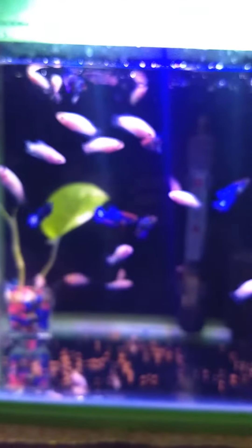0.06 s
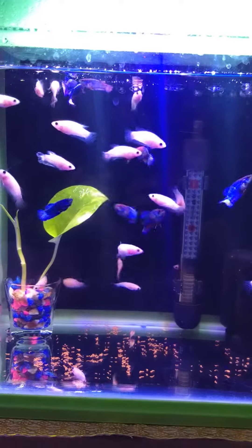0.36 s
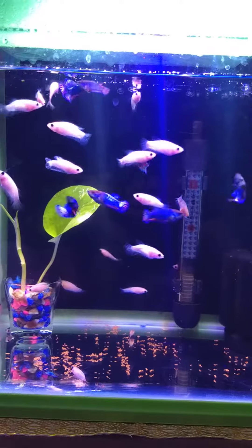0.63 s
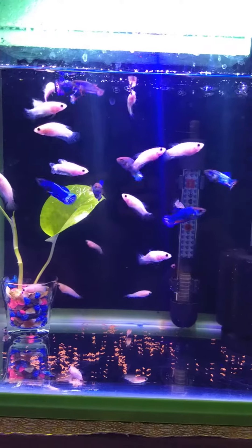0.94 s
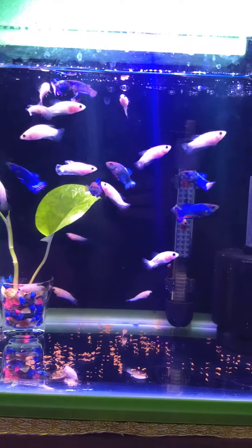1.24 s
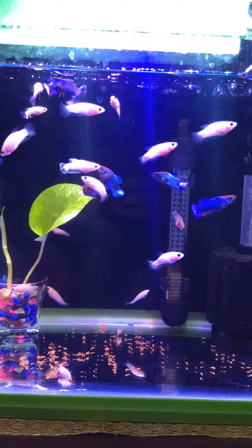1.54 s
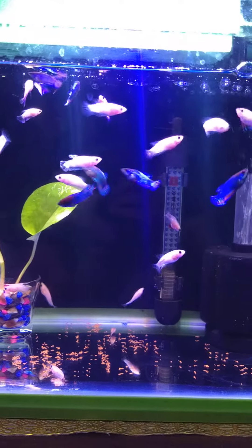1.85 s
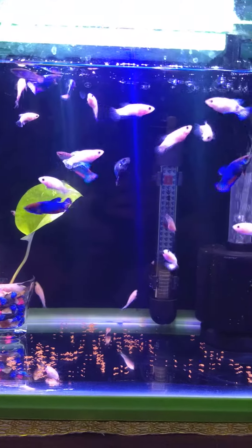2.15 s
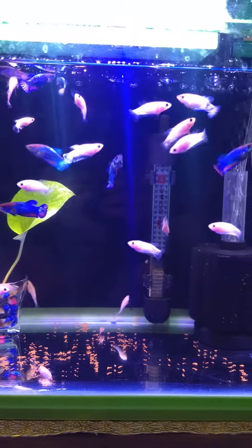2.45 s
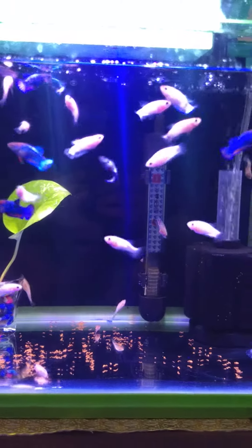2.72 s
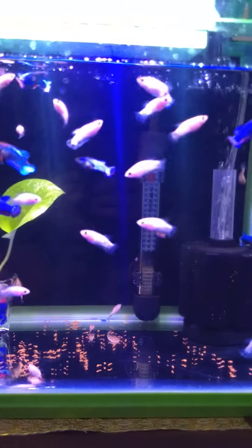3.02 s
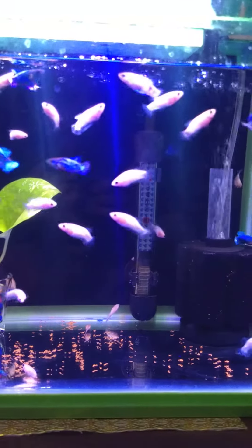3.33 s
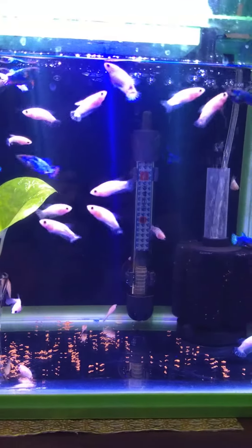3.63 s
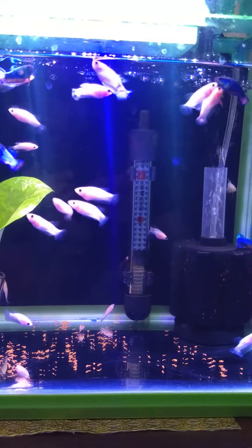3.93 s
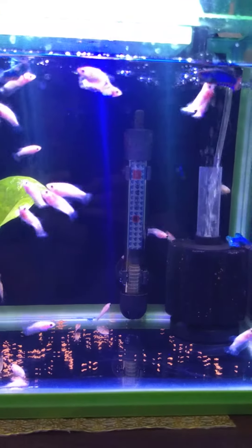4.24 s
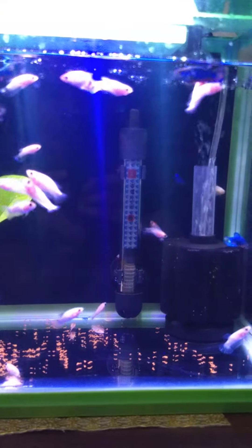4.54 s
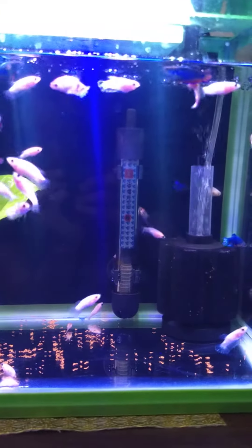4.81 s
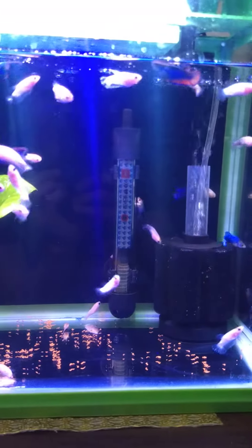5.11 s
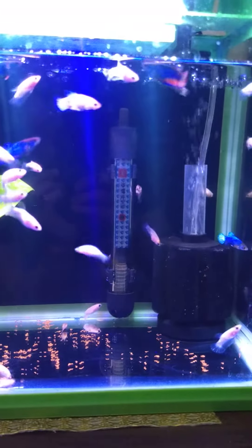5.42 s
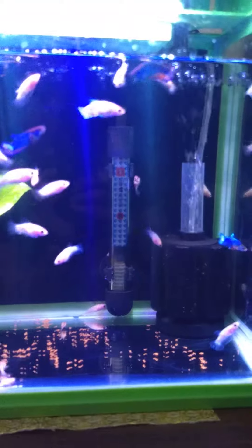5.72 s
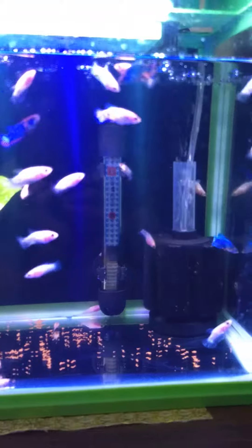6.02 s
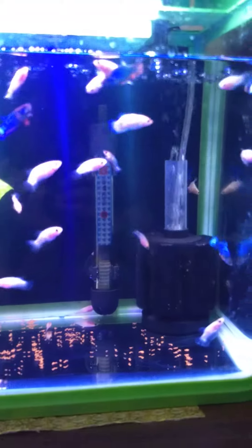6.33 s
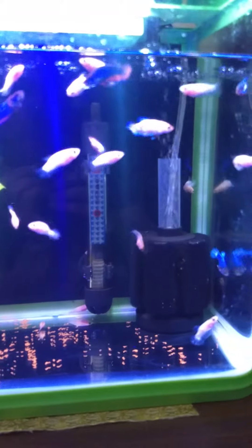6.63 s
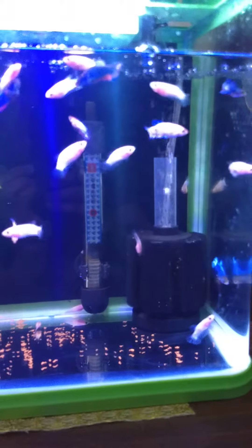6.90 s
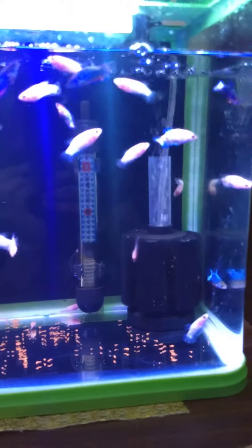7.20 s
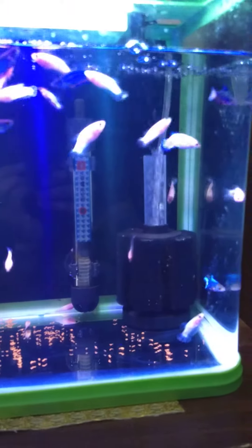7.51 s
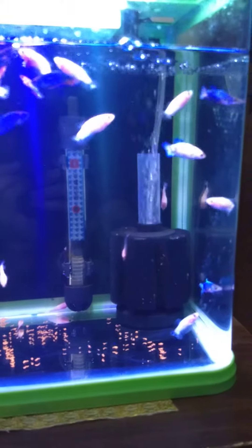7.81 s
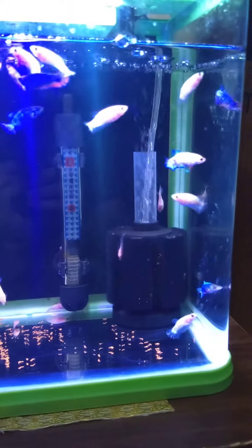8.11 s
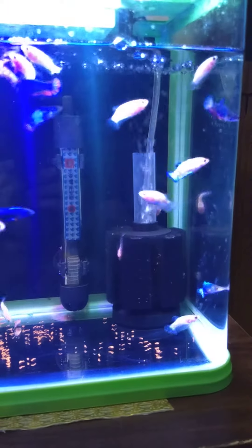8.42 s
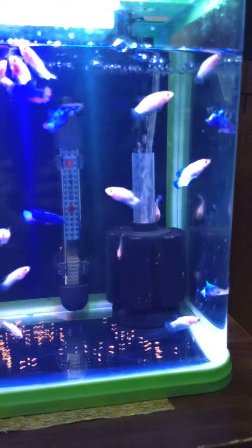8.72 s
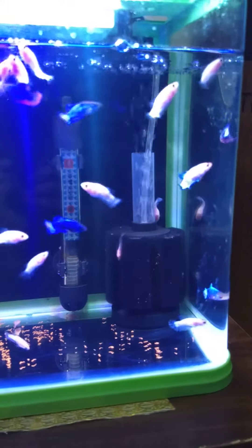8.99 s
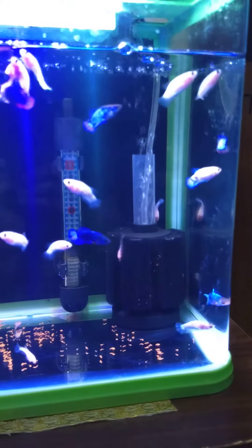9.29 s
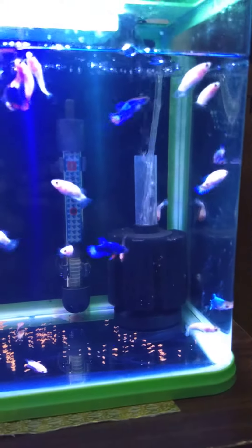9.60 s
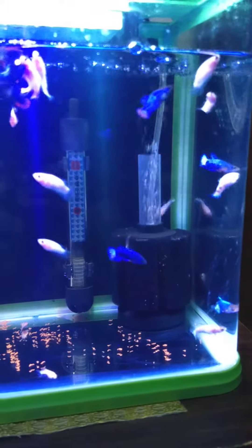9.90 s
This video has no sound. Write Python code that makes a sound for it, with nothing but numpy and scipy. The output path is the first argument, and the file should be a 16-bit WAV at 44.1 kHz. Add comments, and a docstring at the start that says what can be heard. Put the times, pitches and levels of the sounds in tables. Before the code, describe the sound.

A home aquarium's air pump hums steadily in a quiet room while its filter sends up a fine stream of small bubbles. Two sharp, dry clicks sound close by early on. Just past the middle, something scrapes twice, bumps softly and slides on faintly among a few light ticks. The hum and gentle bubbling carry on to the end, heard from near the tank.

```python
"""A low hum and a fine stream of bubbles: a home aquarium in a quiet room. The air pump's diaphragm
taps at mains rate and drones through the tank, while a sponge filter sends up small ringing bubbles.
A few dry clicks sound nearby; something scrapes twice, bumps and slides on faintly. The phone's noise
suppressor opens a little after sharp sounds, and its stereo widener spreads the treble."""
import sys
import numpy as np
from scipy import signal
from scipy.fft import rfft, irfft
from scipy.io import wavfile
from scipy.ndimage import uniform_filter1d

SR = 44100
rng = np.random.default_rng(int(sys.argv[2]) if len(sys.argv) > 2 else 0)


def store_wav(level_fs):
    """Save 16-bit WAV to argv[1]."""
    pcm = np.round(np.clip(np.atleast_2d(level_fs), -1, 1) * 32767)
    wavfile.write(sys.argv[1], SR, pcm.T.astype(np.int16))


N = 438794
TIME = np.arange(N) / SR
FREQ = np.maximum(np.arange(N // 2 + 1) * SR / N, 1)


def undb(db):
    """Decibels to gain."""
    return 10 ** (np.asarray(db) / 20)


def unit(x):
    """Scale to rms 1."""
    return x / np.sqrt(np.mean(x ** 2))


def shape(x, gain):
    """Filter with a gain given at every frequency."""
    return irfft(rfft(x) * gain, N)


def resonance(f, hz, width):
    """Response of one mode, gain 1 at its centre."""
    return 1 / (1 + 1j * (f * f - hz * hz) / (f * width))


def walk(rate_hz):
    """Smooth random drift with a spread near 1."""
    hold = int(SR / rate_hz)
    steps = np.repeat(rng.standard_normal(N // hold + 1), hold)
    return 1.3 * uniform_filter1d(uniform_filter1d(steps, hold), hold)[:N]


def add(out, start_s, sound):
    """Mix a sound in at its start time."""
    i = max(int(start_s * SR), 0)
    out[..., i:i + sound.shape[-1]] += sound[..., :max(N - i, 0)]


def in_room(x, send_db, t60=0.55):
    """The dry sound plus a small room's diffuse tail, different at each microphone."""
    t = TIME[:SR // 2]
    tail = rng.standard_normal((2, len(t))) * np.exp(-np.log(1000) * t / t60) * (t > .004)
    tail /= np.sqrt(np.sum(tail ** 2) / 2)
    return x + undb(send_db) * signal.fftconvolve(x, tail, axes=1)[:, :N]


def air(alike_below_hz=1300, likeness=0.81, flicker_db=.5):
    """Steady wash of room and moving water; the lows are alike at both microphones."""
    # tone of the wash: (frequency [Hz], density [dB per Hz])
    wash_spectrum = [(33, -110), (39, -96), (49, -80.5), (75, -85.5), (125, -83.5), (300, -77.5),
                     (450, -85), (620, -86), (800, -77), (1000, -91.5), (1400, -85.5), (1800, -87.5),
                     (2500, -87), (4200, -94), (6400, -94.5), (8000, -100.7), (13000, -105.5)]
    hz, db = np.transpose(wash_spectrum)
    colour = undb(np.interp(np.log(FREQ), np.log(hz), db)) * np.sqrt(SR / 2)
    alike = likeness / (1 + (FREQ / alike_below_hz) ** 4)
    mid = shape(rng.standard_normal(N), colour * np.sqrt((1 + alike) / 2))
    side = shape(rng.standard_normal(N), colour * np.sqrt((1 - alike) / 2))
    return np.array([mid + side, mid - side]) * undb(flicker_db * walk(7.6))


def burst(hz, width_hz, t60):
    """One contact: quickly dying noise through one resonance."""
    t = TIME[:SR // 2]
    f = np.maximum(np.arange(len(t) // 2 + 1) * SR / len(t), 1)
    decay = np.exp(-np.log(1000) * t / t60)
    noise = rng.standard_normal((2, len(t))) * decay
    sound = irfft(rfft(noise) * resonance(f, hz, width_hz) ** 2, len(t))
    return sound * np.sqrt(2 * np.sum(decay ** 2) / np.sum(sound ** 2))


def ticks():
    """Soft, unpitched ticks that carry into the room."""
    # light contacts: (time [s], level [dB], centre [Hz])
    tick_cues = [(.586, -50, 13000), (2.257, -48, 7500), (3.661, -49.5, 10000), (4.289, -46.5, 8000),
                 (5.3195, -36.5, 7500), (5.35, -43, 8500), (5.781, -36, 4000), (5.795, -38, 9000),
                 (6.001, -34.5, 7500), (6.122, -49, 6000)]
    out = np.zeros((2, N))
    for start, db, hz in tick_cues:
        add(out, start, undb(db) * burst(hz, width_hz=11000, t60=0.039))
    return in_room(out, send_db=-3)


def clicks():
    """Sharp, dry clicks close by, each a short ring and a broad crack."""
    # sharp contacts: (time [s], ring level [dB], ring pitch [Hz], ring width [Hz], crack level [dB])
    click_cues = [(2.116, -48, 11500, 5000, -60), (2.1438, -27.5, 7560, 3600, -41),
                  (2.3558, -27.5, 2790, 500, -32.5)]
    out = np.zeros((2, N))
    for start, ring_db, hz, width_hz, crack_db in click_cues:
        add(out, start, undb(ring_db) * burst(hz, width_hz, t60=0.016))
        add(out, start, undb(crack_db) * burst(hz=6540, width_hz=12000, t60=0.013))
    return in_room(out, send_db=-14)


def knocks():
    """Soft bumps, each a dull thud over a lower boom."""
    # bumps: (time [s], thud level [dB], boom level [dB])
    knock_cues = [(5.783, -33, -48), (5.895, -32, -40)]
    out = np.zeros((2, N))
    for start, thud_db, boom_db in knock_cues:
        add(out, start, undb(thud_db) * burst(hz=315, width_hz=370, t60=0.13))
        add(out, start, undb(boom_db) * burst(hz=122, width_hz=28, t60=0.22))
    return in_room(out, send_db=-5)


def pressure(contact, attack_s=0.016):
    """Each push builds quickly, holds and dies away; overlapping pushes add in power."""
    # pushes of the scraping object: (start [s], hold [s], level [dB], release [dB/s], contact)
    pushes = [(5.615, 0.014, -33.5, 220, "light"), (5.778, 0.005, -28, 270, "hard"),
              (5.82, .004, -31, 270, "hard"), (5.98, .015, -51, 70, "faint"),
              (6.262, .025, -54, 100, "faint")]
    power = np.zeros(N)
    for start, hold, db, release, kind in pushes:
        if kind == contact:
            attack = np.clip((TIME - start) / attack_s, 0, 1)
            released_s = np.clip(TIME - start - attack_s - hold, 0, 2)
            power += (attack * undb(db - release * released_s)) ** 2
    return np.sqrt(power)


def scrape(contact, modes, grain_db, body_db, room_db):
    """Dense uneven slips ring the sliding object's resonances."""
    slips = rng.standard_normal((2, N)) * undb(grain_db * walk(500))
    ring_power = sum(abs(undb(db) * resonance(FREQ, hz, width) ** 2) ** 2 for hz, width, db in modes)
    body = undb(body_db) * abs(resonance(FREQ, hz=3800, width=2800))
    friction = unit(shape(slips, np.sqrt(ring_power + body ** 2)))
    return in_room(friction * pressure(contact), room_db)


def scrapes():
    """An object scrapes lightly, then hard, then slides on faintly."""
    # resonances of each contact: (pitch [Hz], width [Hz], level [dB])
    light_modes = [(780, 99, 5), (1860, 130, -2.5), (3270, 390, -6.5), (4810, 190, 2), (5440, 730, -6),
                   (7340, 350, -5), (7660, 350, -4), (9050, 1100, -14), (10000, 420, -4.5),
                   (10520, 280, -11), (11500, 380, -7), (12700, 350, -13), (15000, 280, -5)]
    hard_modes = [(1140, 680, -12), (1650, 195, 0), (2640, 260, -2.5), (3010, 250, -5), (3500, 280, -7.5),
                  (3940, 600, -13), (5130, 310, 2.5), (5480, 300, -10), (6830, 340, -5.5),
                  (7900, 1400, -19), (9000, 490, -9), (10000, 900, -16), (11450, 500, -15),
                  (13800, 1200, -23)]
    faint_modes = [(3200, 320, -2.2), (4900, 110, 0)]
    light = scrape("light", light_modes, grain_db=1.5, body_db=-21, room_db=-8.5)
    hard = scrape("hard", hard_modes, grain_db=2, body_db=-15, room_db=-7)
    faint = scrape("faint", faint_modes, grain_db=1.5, body_db=-15, room_db=-8)
    return light + hard + faint


def bubble(hz, t60, rise=0.16):
    """A bubble rings and rises in pitch as it reaches the surface."""
    t = TIME[:int(t60 * SR) + 2]
    return np.sin(2 * np.pi * hz * (t + rise * t * t / t60 / 2)) * np.exp(-np.log(1000) * t / t60)


def blips(count=6, span_s=0.094, spread=0.074):
    """Now and then a few larger bubbles burst together."""
    # bubble clusters: (time [s], level per bubble [dB], pitch [Hz])
    clusters = [(1.37, -43, 780), (2.40, -47, 1300), (4.99, -43, 1306), (7.88, -57, 3600)]
    out = np.zeros((2, N))
    for start, db, hz in clusters:
        for late, detune in zip(rng.random(count), rng.standard_normal(count)):
            add(out, start + span_s * late, undb(db) * bubble(hz * np.exp(spread * detune), t60=0.044))
    return in_room(out, send_db=-3)


def bubble_stream(count, hz, spread, cycles, size_db, db, room_db):
    """A stream of small bubbles of scattered pitch and size, heard through the lid."""
    out = np.zeros((2, N))
    for when, (detune, size, pan_db) in zip(rng.random(count), rng.standard_normal((count, 3))):
        pitch = np.clip(hz * np.exp(spread * detune), 200, 12000)
        gain = undb(size_db * size + np.array([[pan_db], [-pan_db]]))
        add(out, when * N / SR, gain * bubble(pitch, t60=cycles / pitch))
    return undb(db) * unit(in_room(out, room_db))


def pump(mains_hz=50.017, ring_cycles=2.6, panel_hz=708, panel_width_hz=87, scatter_rad=0.22):
    """The diaphragm taps once a mains cycle; the tank passes the highs at once, the lows ring late."""
    # low hum, set apart at the two microphones by standing waves:
    # (mains harmonic, left level [dB], right level [dB], left lead [rad])
    hum = [(2, -57, -58, 2), (3, -57, -50, 1.5), (5, -84, -52.5, 0.5), (6, -48, -57.5, 0),
           (7, -43, -42.5, 0.36), (8, -53, -44.5, 1.27), (9, -51.3, -53.5, 0), (10, -58, -70, 1),
           (11, -51.5, -61, -1.5), (12, -51, -57.5, -1.33), (15, -51.5, -50.5, -0.02),
           (16, -56.5, -69.5, 2), (17, -64, -59.5, 0.7), (18, -61, -61, 0.5)]
    # upper buzz, alike at both microphones: (frequency [Hz], level [dB])
    buzz = [(1001, -66), (1050, -70), (1098, -64), (1152, -66.5), (1249, -68.5), (1303, -67.5),
            (1351, -66.5), (1448, -63.5), (1502, -67.5), (1550, -75)]
    # ring of the tank panel as the phone moves along it: (time [s], boost [dB])
    panel_ride = [(0, 1.2), (3.4, 1.5), (4.6, 4), (7.3, 2.5), (8.2, -0.5), (9.95, 1.8)]
    panel_db = np.interp(TIME, *np.transpose(panel_ride))
    mains_phase = 2 * np.pi * mains_hz * TIME + 0.01 * walk(2.92)
    partials = list(hum) + [(round(hz / mains_hz), db, db, 0) for hz, db in buzz]
    out = np.zeros((2, N))
    for harmonic, left_db, right_db, lead in partials:
        hz = harmonic * mains_hz
        # every partial is held back by the same number of its own cycles
        phase = harmonic * mains_phase - 2 * np.pi * ring_cycles * np.log(harmonic)
        # the glass rings on between taps and evens out the drone
        phase += 2 * np.angle(resonance(hz, hz=402, width=32))
        # reflections in the room blur the timing of the short waves
        phase += scatter_rad * hz / panel_hz * rng.standard_normal()
        # back pressure from the bubbles makes each partial flutter
        flutter_db = (1.0 if hz > panel_hz + panel_width_hz else .5) * walk(14)
        panel_share = np.exp(-((hz - panel_hz) / panel_width_hz) ** 2)
        gain = undb(flutter_db + panel_db * panel_share)
        out[0] += undb(left_db) * gain * np.cos(phase + lead / 2)
        out[1] += undb(right_db) * gain * np.cos(phase - lead / 2)
    return np.sqrt(2) * out


def scene():
    """Pump and water, with small handling sounds a little to the right."""
    water = bubble_stream(count=1500, hz=955, spread=0.301, cycles=30, size_db=3.5, db=-58.5, room_db=-5.5)
    fizz = bubble_stream(count=3600, hz=3200, spread=0.37, cycles=18, size_db=2.5, db=-64, room_db=6)
    handling = (scrapes() + clicks() + ticks() + knocks()) * undb([[-1], [1]])
    return air() + handling + blips() + fizz + water + pump()


def suppressor(x, above_hz=5500, threshold_db=-47, open_db=2, hold_s=.68, slew_s=.08):
    """Sharp treble opens the noise suppressor; it holds for a moment, then closes."""
    treble = shape(x, FREQ > above_hz)
    loud = uniform_filter1d(np.mean(treble ** 2, axis=0), SR // 200) > undb(threshold_db) ** 2
    hold, slew = int(hold_s * SR), int(slew_s * SR)
    held = signal.fftconvolve(loud * 1., np.ones(hold))[:N] > .5
    opening = signal.fftconvolve(held * 1., np.ones(slew) / slew)[:N]
    return x * undb(open_db * opening)


def widener(x, share=0.62, from_hz=1680, lag_s=1 / 2400, crossover_rad=0.28):
    """Each channel's treble is fed, late and inverted, to the other."""
    feed = share / (1 + (from_hz / FREQ) ** 20)
    spectrum = rfft(x)
    crossed = feed * np.exp(-1j * (2 * np.pi * FREQ * lag_s + crossover_rad)) * spectrum[::-1]
    return irfft((spectrum - crossed) / np.sqrt(1 + feed ** 2), N)


def record(dry):
    """The phone: noise suppressor, stereo widener and a steep top cut."""
    top_cut = signal.ellip(10, .2, 80, 15800, fs=SR, output="sos")
    return signal.sosfilt(top_cut, widener(suppressor(dry)))


dry = scene()
out = record(dry)
store_wav(out)
```